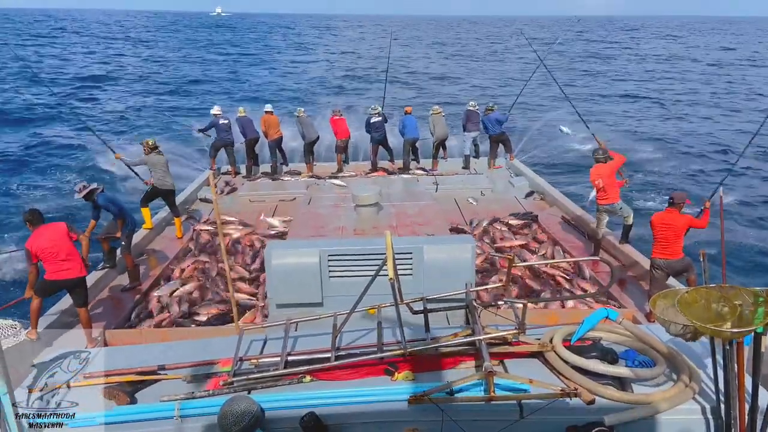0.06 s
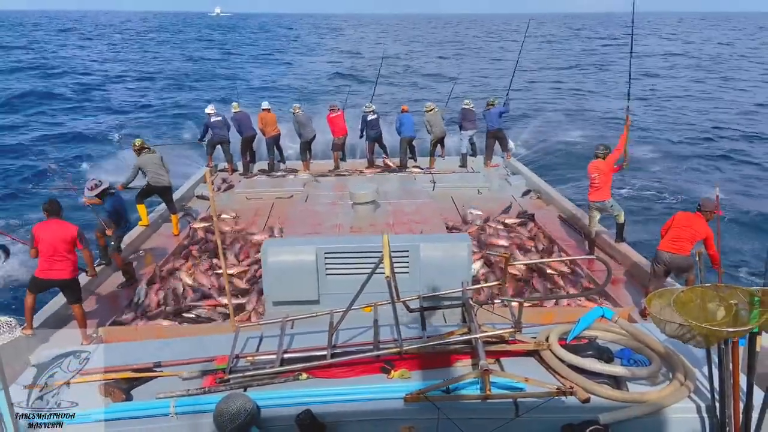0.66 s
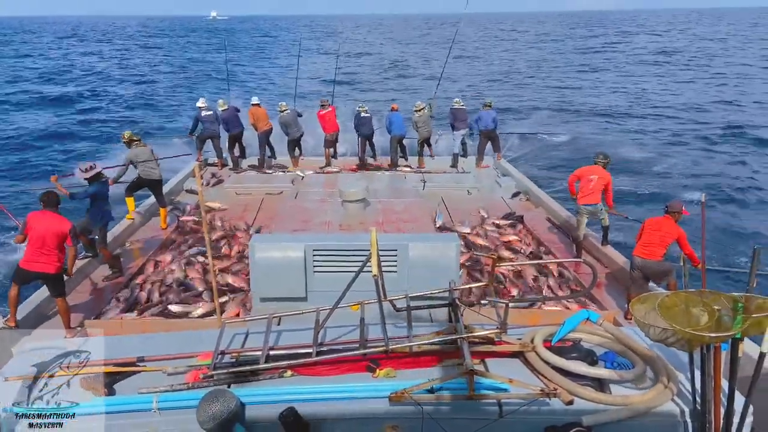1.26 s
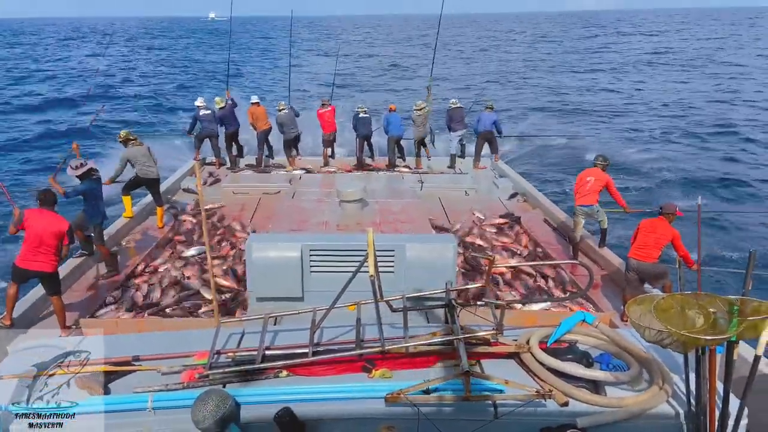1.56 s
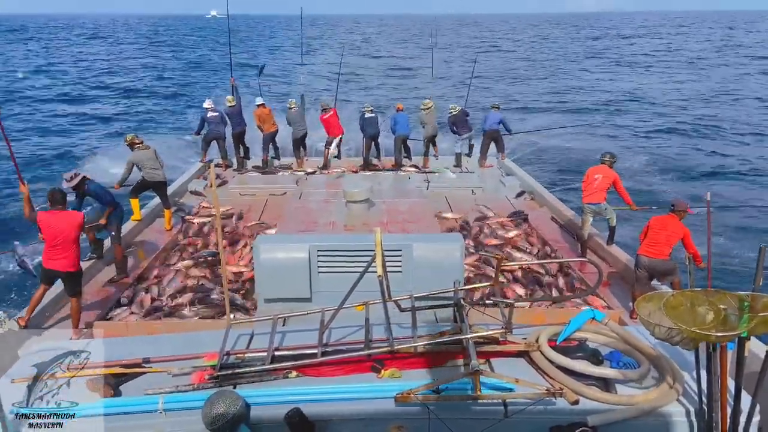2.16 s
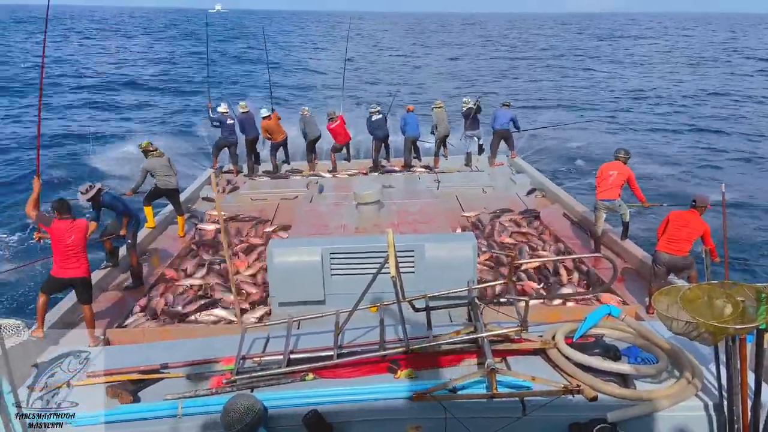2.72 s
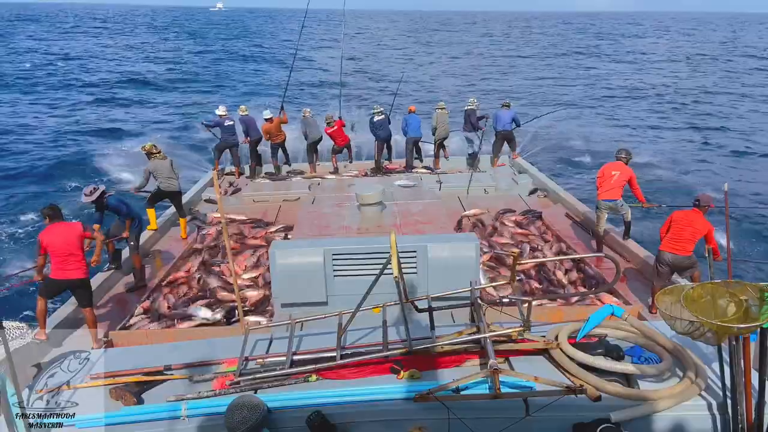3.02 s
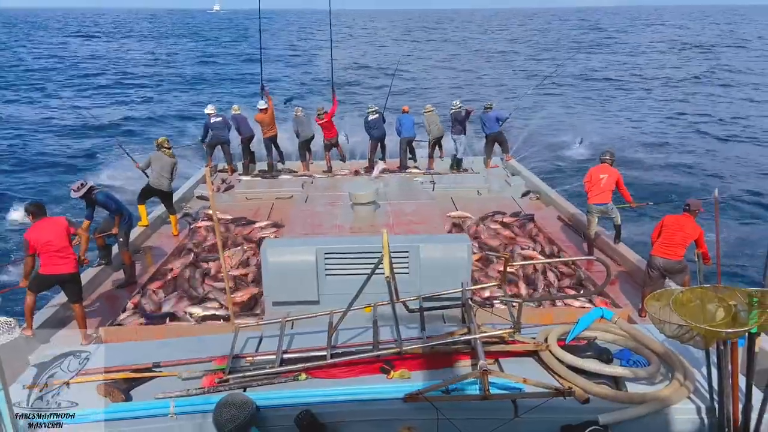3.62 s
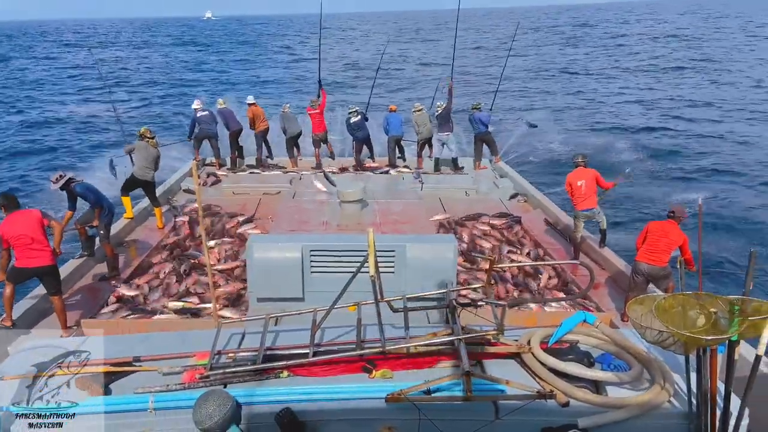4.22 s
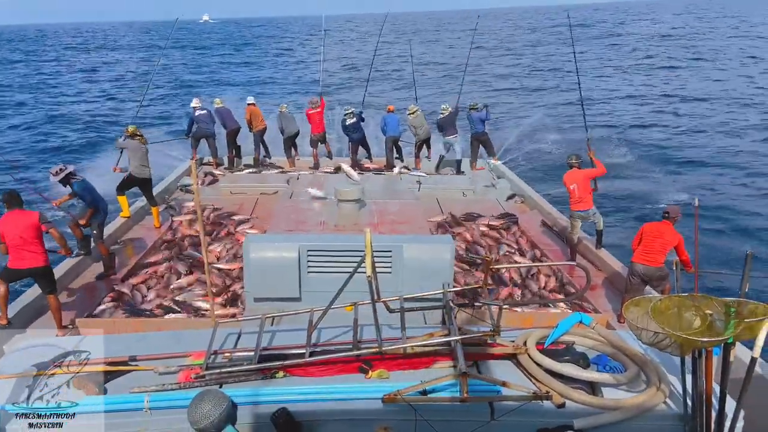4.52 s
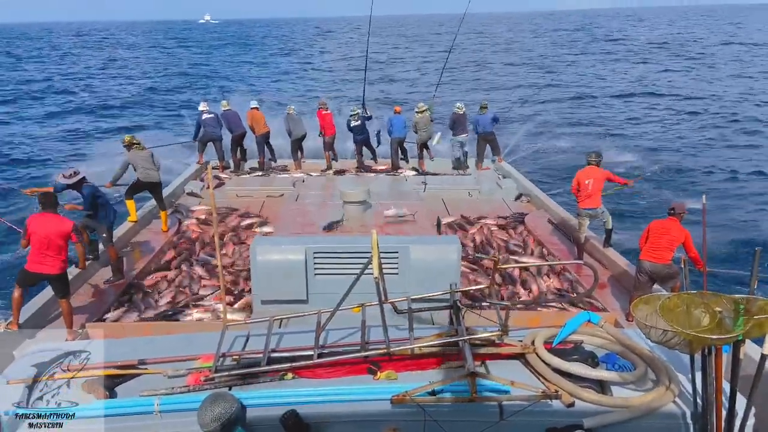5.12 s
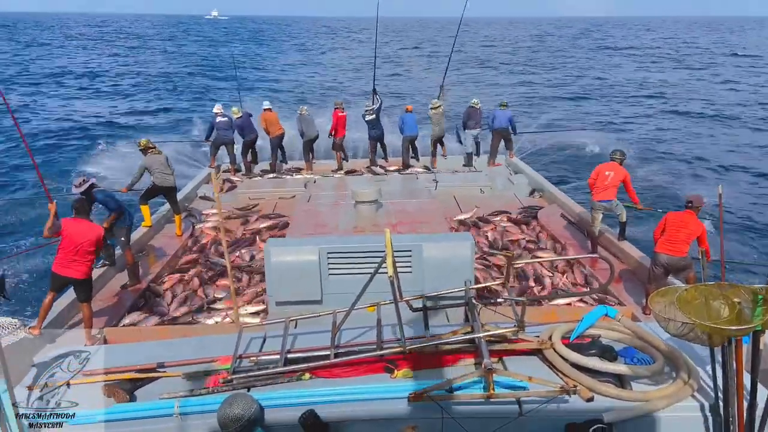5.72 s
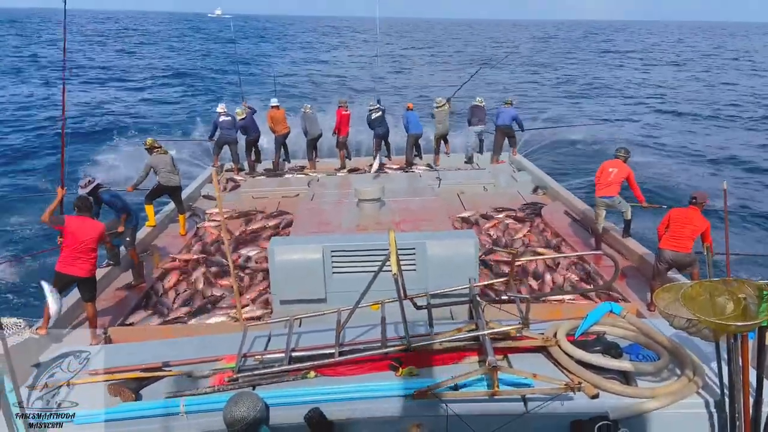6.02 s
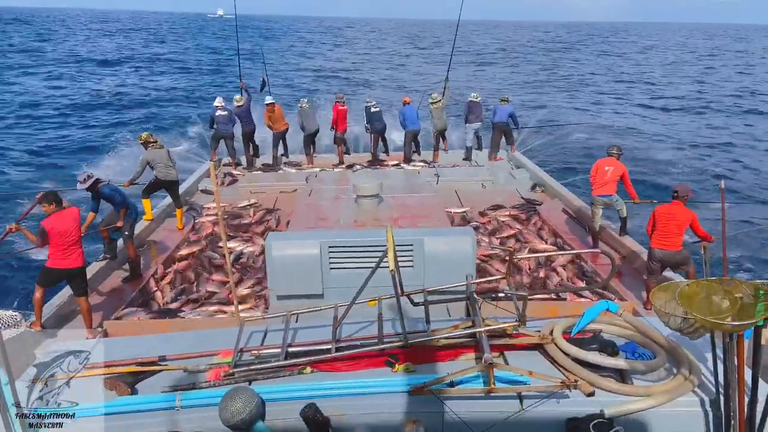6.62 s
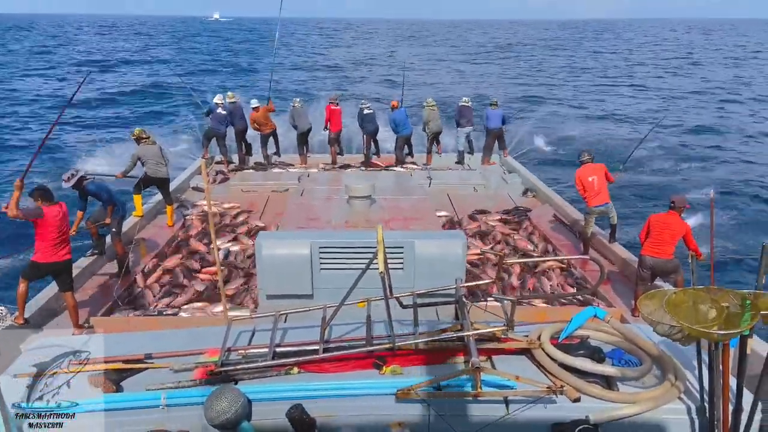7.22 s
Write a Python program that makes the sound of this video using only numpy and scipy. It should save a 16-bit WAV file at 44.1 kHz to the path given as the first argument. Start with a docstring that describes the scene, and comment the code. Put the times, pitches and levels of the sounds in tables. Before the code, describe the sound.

Sprayers on a fishing boat shower the sea with a steady, rain-like hiss, mixed with small splashes, bubbling and a few sharp drips close by, mostly on the left. Machinery drones underneath, and now and then something knocks briefly on the deck. Wind rumbles over the microphone throughout, buffeting it hardest around two seconds in and again towards the end.

```python
"""On a fishing boat under way, rows of sprayers throw water onto the sea like heavy rain.
Countless drops merge into a hiss over the drone of the machinery; bubbles gurgle, bigger gouts
splash down and a few drops tick close by, mostly on the left. Now and then something knocks on
the deck. Wind rumbles over the microphone and buffets it in gusts."""
import sys
import numpy as np
from scipy import signal
from scipy.fft import rfft, irfft, next_fast_len
from scipy.io import wavfile
from scipy.ndimage import uniform_filter1d

SR = 44100
rng = np.random.default_rng(int(sys.argv[2]) if len(sys.argv) > 2 else 0)


def waveform_to_disk(signal):
    """Save audio, clipped to [-1, 1], as 16-bit WAV at the path in sys.argv[1]."""
    frames = np.transpose(np.atleast_2d(signal))
    scaled = np.clip(frames, -1, 1) * 32767
    samples = np.round(scaled).astype(np.int16)
    wavfile.write(sys.argv[1], SR, samples)


N = 320589


def from_db(db):
    return 10 ** (np.asarray(db) / 20)


def unit_rms(x):
    return x / np.sqrt(np.mean(x ** 2) + 1e-20)


def in_time(rows):
    """Each column of a curve, sample by sample."""
    seconds, *columns = np.transpose(rows)
    return [np.interp(np.arange(N) / SR, seconds, c) for c in columns]


def in_frequency(rows):
    """Each column of a spectrum, bin by bin."""
    hz, *columns = np.transpose(rows)
    bins = np.fft.rfftfreq(next_fast_len(N), 1 / SR) + 1
    return [np.interp(np.log(bins), np.log(hz), c) for c in columns]


def filtered(x, response):
    return irfft(rfft(x, next_fast_len(N)) * response, next_fast_len(N))[..., :N]


def eq_gain(curve):
    """Gain per bin from points of (Hz, dB)."""
    return from_db(in_frequency(curve)[0])


def colour(x, spectrum):
    """Gives a flat sound this spectrum, with steep skirts beyond its ends, and keeps its power."""
    (low, low_db), (high, high_db) = spectrum[0], spectrum[-1]
    skirted = [(low / 10, low_db - 60), *spectrum, (high * 10, high_db - 60)]
    return filtered(x, unit_rms(eq_gain(skirted)))


def drift(rate_hz):
    """A smooth random wander with a spread of 1."""
    hop, run_in = 40, 2000
    r = np.exp(-2 * np.pi * rate_hz * hop / SR)
    noise = rng.standard_normal(N // hop + run_in + 2)
    slow = signal.lfilter([1], [1, -2 * r, r * r], noise)[run_in:]
    return np.interp(np.arange(N) / hop, np.arange(len(slow)), unit_rms(slow))


def flicker(rate_hz):
    """A drift with its slow swells taken out."""
    wander = drift(rate_hz)
    return unit_rms(wander - uniform_filter1d(wander, size=SR // 4))


def resonate(x, hz, width_hz):
    """A resonance that keeps the power of a flat sound."""
    r = np.exp(-np.pi * width_hz / SR)
    feedforward = np.sqrt((1 - r * r) / 2) * np.array([1, 0, -1])
    feedback = [1, -2 * r * np.cos(2 * np.pi * hz / SR), r * r]
    return signal.lfilter(feedforward, feedback, x + 1e-18)


def burst(t60):
    """A dying puff of noise on two paths, direct and scattered."""
    t = np.arange(SR // 4) / SR
    return rng.standard_normal((2, len(t))) * from_db(-60 * t / t60)


def ring(hz, t60, rise=0):
    """A dying tone whose pitch climbs by the share `rise` over its decay time."""
    t = np.arange(SR // 8) / SR
    return np.sin(2 * np.pi * hz * t * (1 + rise * t / t60 / 2)) * from_db(-60 * t / t60)


def add(out, at_s, sound):
    start = max(round(at_s * SR), 0)
    out[:, start:start + sound.shape[-1]] += sound[..., :N - start]


def by_chance(per_s, spread_db):
    """Random events. Each row: start in seconds, level offset in dB, size from 0 to 1."""
    when, strength, size = rng.random((round(per_s * N / SR), 3)).T
    return zip(when * (N - 1) / SR, spread_db * (2 * strength - 1), size)


def drops(per_s, size_db, cycles, clump_db):
    """Drops land in clumps; each leaves a bubble that rings for a few cycles."""
    out, bands = np.zeros((2, N)), 18
    for hz in np.geomspace(900, 12000, bands):
        landings = np.flatnonzero(rng.random(N) < per_s / bands / SR * from_db(clump_db * drift(9)))
        sizes = from_db(size_db * np.minimum(rng.exponential(1, len(landings)), 4))
        clicks = np.zeros((2, N))
        clicks[:, landings] = sizes * rng.choice([-1, 1], (2, len(landings)))
        out += np.sqrt(hz) * unit_rms(resonate(clicks, hz, 2 * hz / cycles))
    return unit_rms(out)


# How much spray reaches the sea. Each row: time in seconds, relative level in dB.
SPRAY_FLOW = [(0.0, -29.5), (0.7, -30), (1.0, -28), (1.38, -28.5), (1.52, -31), (1.66, -29.5), (1.88, -30),
              (2.8, -29), (3.2, -29), (3.75, -29.5), (3.88, -31.5), (4.0, -28.5), (5.04, -28.5),
              (5.27, -30.5), (5.45, -30.5), (6.3, -30), (7.08, -31), (7.27, -28)]
# The tone of the falling water. Each row: frequency in Hz, relative level in dB.
SPRAY_TONE = [(400, -4.5), (700, 5), (1050, -0.5), (1350, -7.5), (1900, -7), (2800, -10.5), (4200, -11.5),
              (5600, -10.5), (7200, -18.5), (8700, -36), (11500, -36.5), (15000, -56)]

def spray(hiss_db, drops_db, patter_db, mist_db):
    """Far drops merge into a hiss, near ones stay grainy; the jets sputter and the mist drifts."""
    flow_db, = in_time(SPRAY_FLOW)
    grain = from_db(drops_db) * drops(per_s=2600, size_db=2.5, cycles=5.6, clump_db=3.5)
    hiss = from_db(hiss_db) * rng.standard_normal((2, N))
    water = colour(hiss + grain, SPRAY_TONE)
    # Heavy drops give the body and fall less evenly; fine mist gives the top.
    heavy = filtered(water, eq_gain([(1200, 5.5), (2200, -7.5), (4000, -26), (8000, -62)]))
    patter = heavy * from_db(flow_db + patter_db + 1.23 * flicker(39))
    mist = (water - heavy) * from_db(flow_db + mist_db + 0.36 * flicker(2.3))
    sputter = from_db(0.92 * flicker(15.6))
    return (patter + mist) * sputter


# The tone of the machinery. Each row: frequency in Hz, relative level in dB.
DRONE_TONE = [(110, -19), (165, 7), (240, -3), (330, -4.5), (440, -9), (520, -6.5), (640, 0.5), (750, 4),
              (820, -23), (1000, -20)]

def drone(level_db, waver_db):
    """Engine and pumps blur into one steady, hollow roar."""
    roar = colour(rng.standard_normal((2, N)), DRONE_TONE)
    return roar * from_db(level_db + waver_db * drift(13.0))


def air_noise(likeness):
    """Pressure noise that the microphone's two ports share, from not at all (0) to fully (1)."""
    mid, side = rng.standard_normal((2, N))
    return np.sqrt((1 + likeness) / 2) * mid + np.sqrt((1 - likeness) / 2) * side * [[1], [-1]]


# The strength of the wind. Each row: time in seconds, relative level in dB.
WIND_STRENGTH = [(0.0, -24.5), (0.1, -18), (0.58, -19), (1.4, -21.5), (1.58, -13), (1.92, -12.5),
                 (2.04, -14.5), (2.17, -17), (2.285, -15.5), (2.32, -29.5), (2.55, -29.5), (2.95, -23),
                 (3.46, -25.5), (3.81, -31), (4.26, -22.5), (4.51, -27), (4.85, -25), (5.16, -17.5),
                 (6.26, -18), (6.33, -15.5), (6.5, -18.5), (6.68, -13), (6.97, -21), (7.27, -21)]
# The wind's low end. Each row: frequency in Hz, relative level in dB.
RUMBLE_TONE = [(15, -36), (30, -15), (45, -2.5), (58, 5.5), (74, 6), (90, 1.5), (130, -6), (200, -14.5),
               (350, -26.5)]

def wind_rumble(level_db, evenness):
    """Wind rolls over the microphone, its random swells evened out to follow the wind's strength."""
    wind_db, = in_time(WIND_STRENGTH)
    roll = colour(air_noise(likeness=0.935), RUMBLE_TONE)
    power = uniform_filter1d(np.mean(roll ** 2, axis=0), SR // 12)
    return unit_rms(roll / power ** (evenness / 2)) * from_db(wind_db + level_db)


# Gusts breaking into eddies. Each row: start in seconds, hold in seconds, relative level in dB.
WIND_GUSTS = [(1.555, 0.058, -20.5), (1.756, 0.19, -17.5), (1.999, 0.13, -14.5), (2.214, 0.073, -15.5),
              (2.754, 0.08, -19), (2.954, 0.05, -16.5), (3.428, 0.068, -20), (4.42, 0.035, -28),
              (4.574, 0.02, -22.5), (4.63, 0.035, -20.5), (5.213, 0.057, -18.5), (5.42, 0.12, -23),
              (5.794, 0.085, -20), (6.014, 0.16, -18), (6.6, 0.085, -25), (6.774, 0.16, -28.5)]

def turbulence_envelope(calm_db, attack_s, release_s):
    """Turbulence in dB: it loosely follows the wind, and each gust swells, holds and dies on top."""
    wind_db, = in_time(WIND_STRENGTH)
    t = np.arange(N) / SR
    power = from_db(calm_db + 0.28 * (wind_db + 20)) ** 2  # -20 dB is a typical wind
    for start, hold, db in WIND_GUSTS:
        corners = [start - attack_s, start, start + hold, start + hold + release_s]
        power += (from_db(db) * np.interp(t, corners, [0, 1, 1, 0])) ** 2
    return 10 * np.log10(power)


# The tones of big eddies and of small, bright ones. Each row: frequency in Hz, relative level in dB.
EDDY_TONE = [(50, -41), (110, 0), (165, 0.5), (240, -6.5), (350, -12), (550, -27.5), (900, -51)]
RIPPLE_TONE = [(200, 2.5), (380, 1), (600, -6.5), (1000, -12)]

def wind_eddies(turbulence_db, eddy_db, ripple_db, lumpy_db, lean_left_db):
    """Turbulence at the microphone: a lumpy flutter above the rumble that grows in the gusts."""
    wind_db, = in_time(WIND_STRENGTH)
    lumps = unit_rms(from_db(lumpy_db * np.tanh(drift(43))))
    eddies = colour(air_noise(likeness=0.67) * lumps, EDDY_TONE) * from_db(eddy_db)
    # Where turbulence outweighs the rumble, the eddies are small and sound brighter.
    brighten_db = 0.88 * (turbulence_db - wind_db)
    ripple = colour(air_noise(likeness=0.49) * lumps, RIPPLE_TONE) * from_db(ripple_db + brighten_db)
    pan = from_db([[lean_left_db], [-lean_left_db]])
    return (eddies + ripple) * from_db(turbulence_db) * pan


def gurgles(per_s, level_db, low_hz, high_hz, cycles, rise):
    """Big bubbles in the churned water ring briefly and climb in pitch as they surface."""
    out = np.zeros((2, N))
    for start, db, size in by_chance(per_s, spread_db=5.5):
        hz = high_hz * (low_hz / high_hz) ** size
        add(out, start, from_db(level_db + db) * ring(hz, cycles / hz, rise))
    return out


# The biggest gouts of water landing.
# Each row: start in seconds, relative level in dB, pitch in Hz, 60 dB decay time in seconds.
GOUTS = [(.557, -26, 2500, 0.15), (1.265, -31.5, 1500, 0.089), (1.384, -27, 1700, 0.065),
         (1.833, -32, 2600, 0.039), (2.312, -30, 1600, .04), (2.345, -24, 1600, 0.018),
         (2.429, -28, 2100, 0.17), (2.71, -27.5, 1500, .07), (2.944, -26.5, 1070, 0.088),
         (3.417, -31.5, 3000, 0.41), (4.078, -27, 1400, .05), (4.088, -26, 2900, 0.04),
         (4.242, -29, 2700, .07), (4.364, -23, 2000, 0.03), (4.381, -28, 2200, .06),
         (4.555, -30, 1900, .05), (4.72, -27, 2100, .05), (4.939, -27, 1900, .04),
         (4.977, -17, 3500, 0.018), (5.171, -28, 3300, 0.13), (5.599, -26.5, 2500, 0.09),
         (5.705, -27, 3300, .04), (5.86, -27, 2500, 0.12), (5.948, -25, 2000, 0.048),
         (5.988, -23.5, 1400, 0.03), (6.049, -27, 1300, 0.033), (7.181, -27, 2400, 0.07),
         (7.211, -30, 900, 0.085)]

def splashes(level_db, ragged_db):
    """A gout slaps the sea and breaks up raggedly, each at its own pitch."""
    out = np.zeros((2, N))
    for start, db, hz, t60 in GOUTS:
        add(out, start, from_db(db + level_db) * resonate(burst(t60), hz, width_hz=1.1 * hz))
    ragged = unit_rms(from_db(ragged_db * np.tanh(drift(220))))
    tone = eq_gain([(300, -6), (800, 7), (6000, -1.0), (8300, -8), (10500, -39), (15000, -59)])
    return filtered(out * ragged, tone)


# Hard things knocking on the deck.
# Each row: start in seconds, relative level in dB, pitch in Hz, 60 dB decay time in seconds.
DECK_KNOCKS = [(1.325, -19, 1610, .04), (1.833, -13, 1060, .035), (2.345, -14, 1240, 0.017),
               (2.710, -12, 1033, .075), (2.784, -17, 1090, .04), (2.944, -15, 950, 0.046),
               (4.777, -12, 980, 0.087), (5.821, -13, 790, .03), (7.210, -11, 790, 0.029)]

def knocks(ring_db, rattle_db, top_hz):
    """Each knock rings at one pitch on the direct path, with a dull, rough rattle around it."""
    out = np.zeros((2, N))
    for start, db, hz, t60 in DECK_KNOCKS:
        add(out, start, from_db(db + ring_db) * ring(hz, t60) * [[1], [0]])
        add(out, start, from_db(db + rattle_db) * resonate(burst(t60), hz, width_hz=hz))
    return signal.sosfilt(signal.butter(4, top_hz, fs=SR, output="sos"), out + 1e-18)


# Sharp drops close by. Each row: time in seconds, relative levels of click and of spatter in dB.
CLOSE_DROPS = [(1.3843, -18, -39), (1.6871, -20, -32), (2.6504, -16, -30), (2.7342, -15, -29),
               (3.4335, -17, -32), (4.8037, -22, -30), (4.9784, -14, -37), (5.0355, -18, -39),
               (5.2004, -14, -31), (5.3426, -17, -31), (5.3834, -7.2, -28), (5.5584, -13.5, -30)]
# Their bright, glassy tone. Each row: frequency in Hz, relative level in dB.
TICK_TONE = [(1000, -30), (4300, -4), (5200, 8.5), (6600, 5), (7200, -5), (8400, -13), (15000, -62)]

def ticks(click_db, spatter_db, swell_s, fade_s):
    """A fine spatter arrives near the microphone, and its biggest drop bursts in one sharp click."""
    out, half = np.zeros((2, N)), SR // 10
    t = np.arange(-half, half) / SR
    envelope = np.exp(np.minimum(t / swell_s, -t / fade_s))
    for at_s, click, spatter in CLOSE_DROPS:
        add(out, at_s, from_db(click + click_db) * np.array([[1], [0]]))  # direct path only
        shower = envelope * rng.standard_normal((2, len(t)))
        add(out, at_s - half / SR, from_db(spatter + spatter_db) * shower)
    return colour(out, TICK_TONE)


# The hardest thumps of wind. Each row: time in seconds, relative level in dB, width in seconds.
STRONG_EDDIES = [(1.566, -6.5, 0.0017), (1.583, -7, .0015), (1.807, -5.5, 0.00096), (1.958, -3.5, 0.0016),
                 (2.016, -1.5, 0.0017), (2.05, -1, .0016), (2.102, -2, 0.0015), (2.154, -10, 0.0014),
                 (2.241, -6, 0.0019), (2.266, -9, 0.00068), (2.282, -10, 0.0016), (2.765, -9, 0.00074),
                 (2.959, -11, 0.00084), (2.985, -10, 0.00098), (3.559, -8, .0009), (4.455, -12, 0.00093),
                 (4.648, -7.5, 0.0014), (5.204, -6, 0.0016), (5.266, -1.5, 0.0011), (5.438, -5.5, 0.0019),
                 (5.536, -6.5, 0.0017), (5.79, -5, 0.0023), (5.858, -4.5, 0.0017), (6.045, -8, 0.00056),
                 (6.316, -2.5, 0.0031), (6.352, -7.5, 0.003), (6.393, -7, 0.002), (6.686, -11.5, 0.00095),
                 (6.832, -9.5, 0.0017), (6.951, -9, 0.0014)]

def buffets(turbulence_db, level_db, uneven_db, lesser_per_s):
    """A strong eddy is one short push or pull on the ports, with a rebound before and after."""
    out, half = np.zeros((2, N)), SR // 100
    # Lesser thumps come at random and ride on the level of the turbulence.
    lesser = [(at_s, turbulence_db[int(at_s * SR)] + 4 + db, 0.0016 * (0.5 + size))
              for at_s, db, size in by_chance(lesser_per_s, spread_db=6.0)]
    for at_s, db, width_s in STRONG_EDDIES + lesser:
        u = np.arange(-half, half) / SR / width_s
        thump = (1 - u ** 2) * np.exp(-u ** 2 / 2)
        polarity = rng.choice([-1, 1])
        port_gains = from_db(db + level_db + uneven_db * rng.standard_normal((2, 1)))
        add(out, at_s - half / SR, polarity * port_gains * thump)
    return out


# Tiny clicks in the top end. Each row: start in seconds, relative level in dB.
HIGH_SPECKS = [(2.1216, -44), (2.2598, -39), (2.5581, -46), (2.614, -44), (3.039, -43), (3.1418, -43),
               (3.2505, -45), (3.4052, -44), (3.7374, -38), (3.8152, -44), (4.1954, -43), (4.3635, -43),
               (4.4059, -46), (4.8015, -47), (5.0818, -40), (5.1821, -42), (5.3652, -45), (5.8222, -45),
               (5.8526, -46), (6.3854, -45), (7.0738, -50), (7.1596, -42)]

def specks(level_db, t60, hz, width_hz):
    """Faint, very high, brief clicks around 11 kHz."""
    out = np.zeros((2, N))
    for start, db in HIGH_SPECKS:
        add(out, start, from_db(db + level_db) * burst(t60))
    return resonate(out, hz, width_hz)


# The stereo image of the boat at the microphone's two ports.
# Each row: frequency in Hz, left over right in dB, likeness from 0 to 1, left lead in radians.
STEREO_IMAGE = [(180, 3, 0.65, 0), (400, -3, 0.68, 0), (600, -3, 0.88, 1.6), (790, 0, 0.95, 2.7),
                (1150, 0, 0.65, 2.9), (1600, 9, 0.15, 4.7), (2200, 9, 0.68, 7.9), (2650, 13, 0.2, 7.2),
                (3800, 9, 0.2, 6.6), (5600, 11, 0.45, 10.5), (7000, 8, 0.47, 7.8), (10500, 0, 0.8, 8.4)]

def at_ports(paths):
    """The left port hears the direct sound; the right gets it later, shaded, with the deck's scatter."""
    direct, scattered = paths
    left_db, likeness, lead = in_frequency(STEREO_IMAGE)
    shade = from_db(-left_db)
    delayed = filtered(direct, shade * likeness * np.exp(-1j * lead))
    diffuse = filtered(scattered, shade * np.sqrt(1 - likeness ** 2))
    return np.array([direct, delayed + diffuse])


def scene():
    """Water and boat share one stereo image; the wind plays straight on the microphone."""
    water = spray(hiss_db=-2.0, drops_db=-4.0, patter_db=4, mist_db=3)
    water += splashes(level_db=2.5, ragged_db=4.0)
    water += gurgles(per_s=9, level_db=-24, low_hz=1150, high_hz=3080, cycles=11, rise=0.19)
    water += ticks(click_db=8.7, spatter_db=0.7, swell_s=0.018, fade_s=0.01)
    high_clicks = specks(level_db=2.5, t60=0.016, hz=10900, width_hz=2400)
    turbulence_db = turbulence_envelope(calm_db=-26.5, attack_s=0.031, release_s=0.022)
    wind = wind_rumble(level_db=0.17, evenness=0.35)
    wind += wind_eddies(turbulence_db, eddy_db=-3.5, ripple_db=-13.0, lumpy_db=6.0, lean_left_db=2.1)
    wind += buffets(turbulence_db, level_db=-0.25, uneven_db=2.0, lesser_per_s=5)
    boat = knocks(ring_db=1.0, rattle_db=-15, top_hz=4000) + drone(level_db=-27.0, waver_db=1.4)
    return at_ports(water + high_clicks + boat) + wind


def record(dry):
    """A soft clip rounds the strongest peaks, and a steep low-pass cuts the very top."""
    ceiling, stop_hz = 0.93, 16000
    rounded = ceiling * dry / (ceiling ** 4 + dry ** 4) ** 0.25
    return signal.sosfilt(signal.cheby2(12, 70, stop_hz, fs=SR, output="sos"), rounded)


dry = scene()
out = record(dry)
waveform_to_disk(out)
```